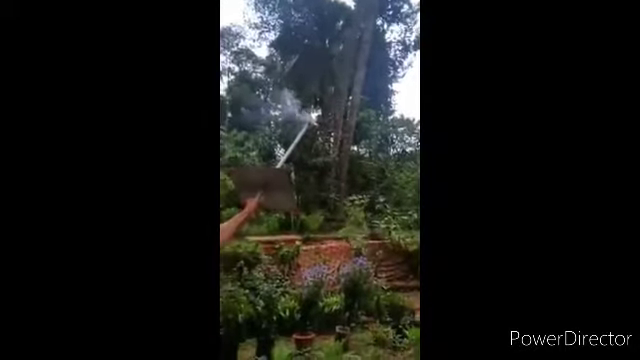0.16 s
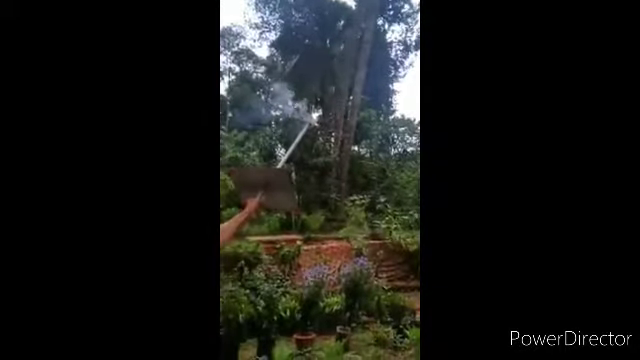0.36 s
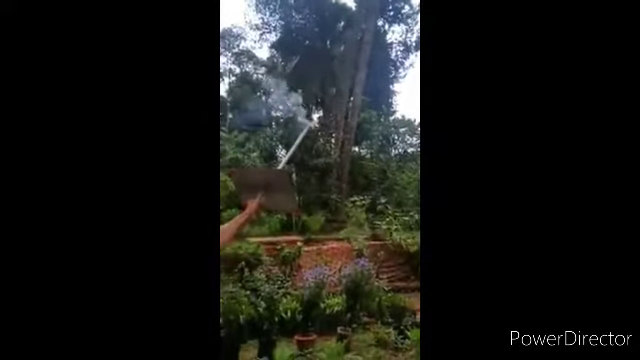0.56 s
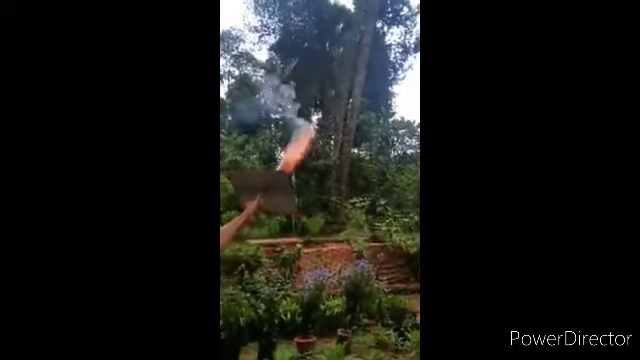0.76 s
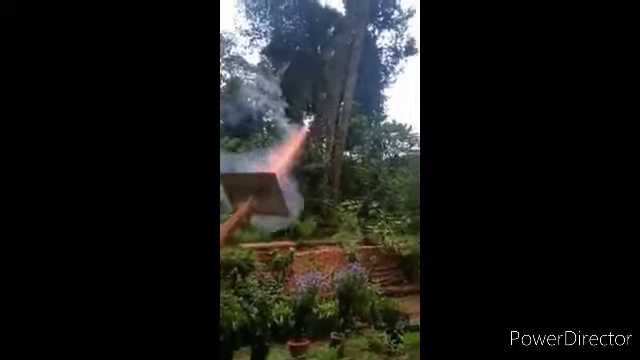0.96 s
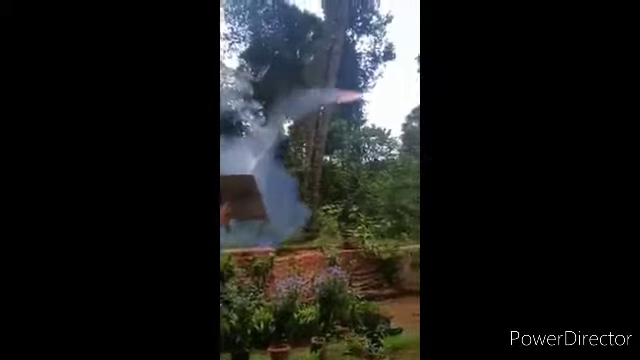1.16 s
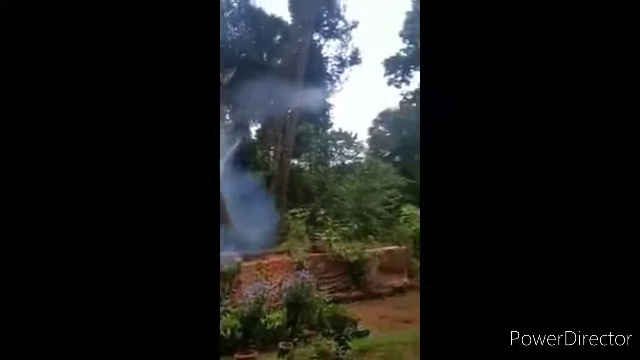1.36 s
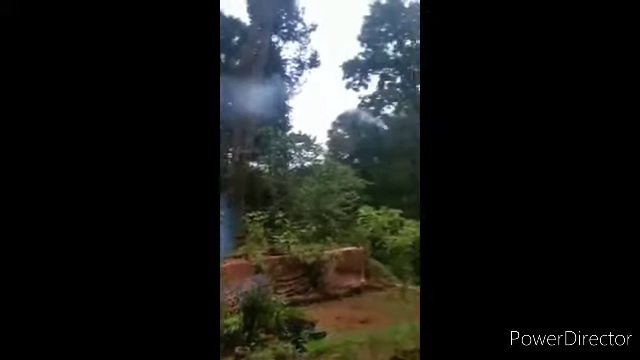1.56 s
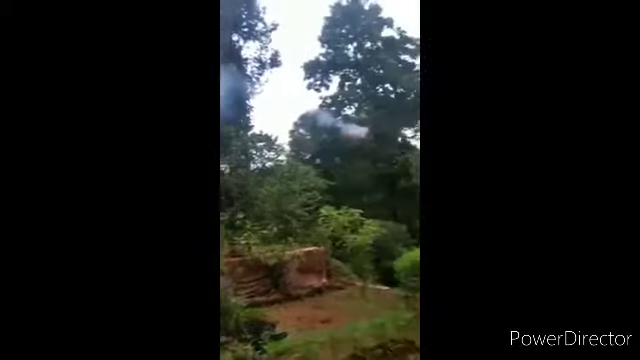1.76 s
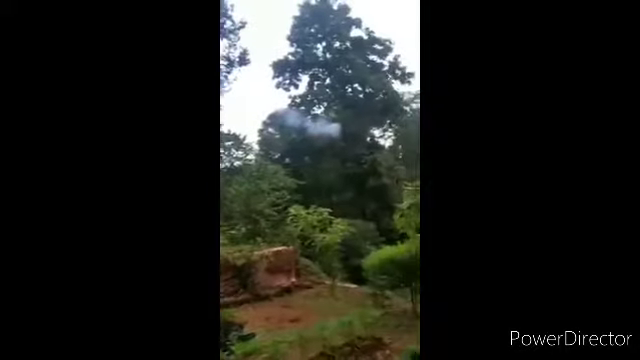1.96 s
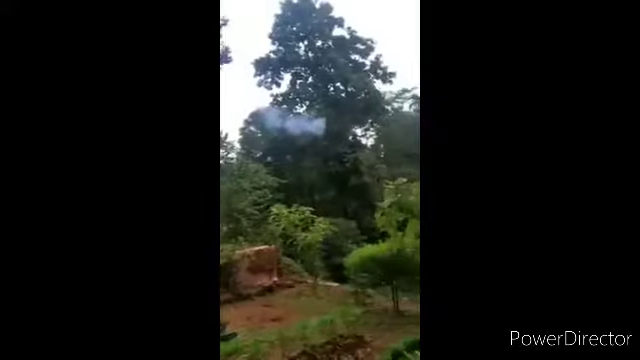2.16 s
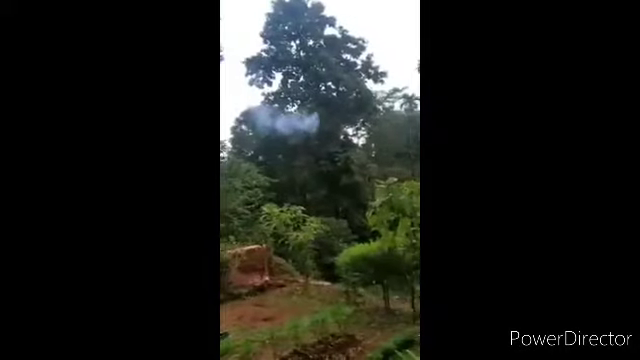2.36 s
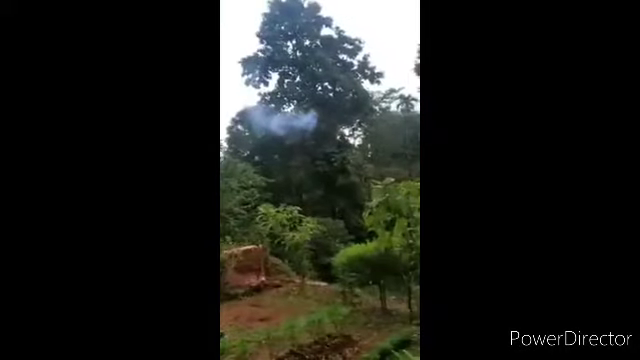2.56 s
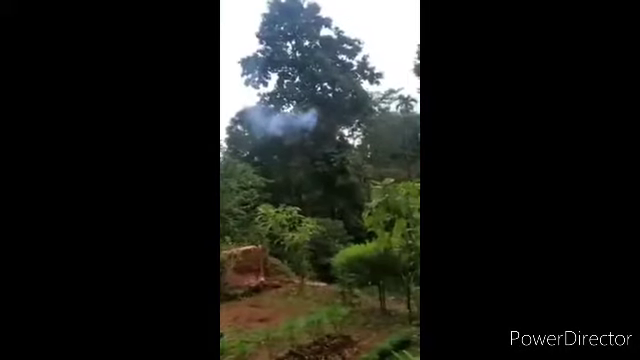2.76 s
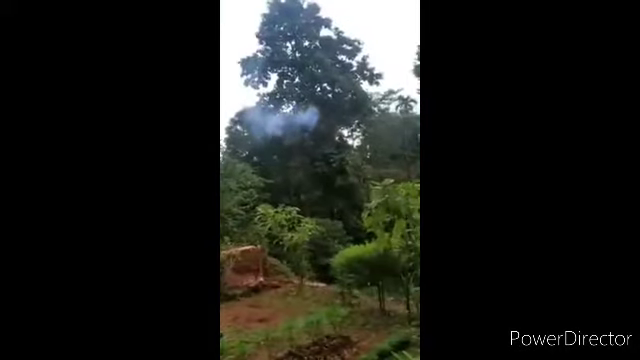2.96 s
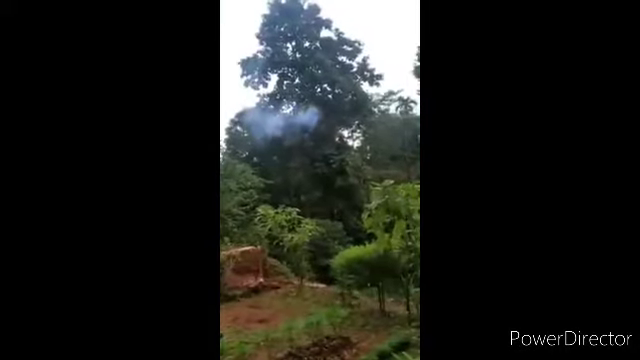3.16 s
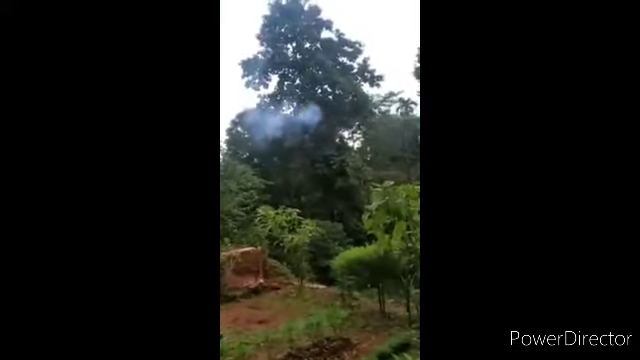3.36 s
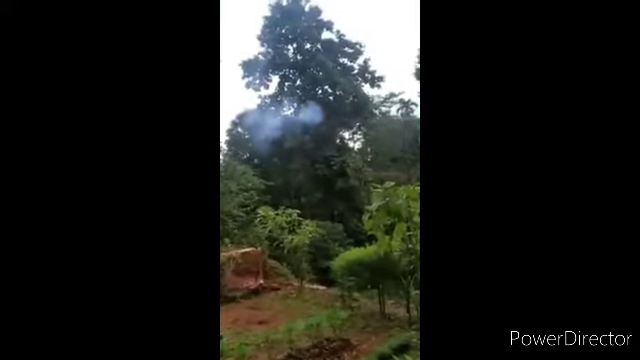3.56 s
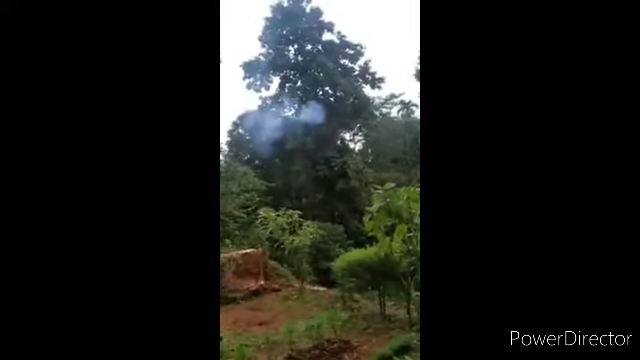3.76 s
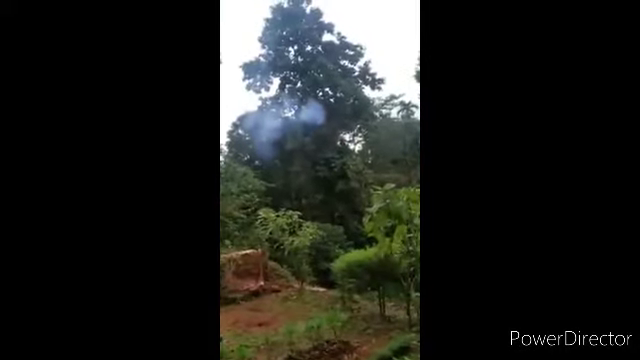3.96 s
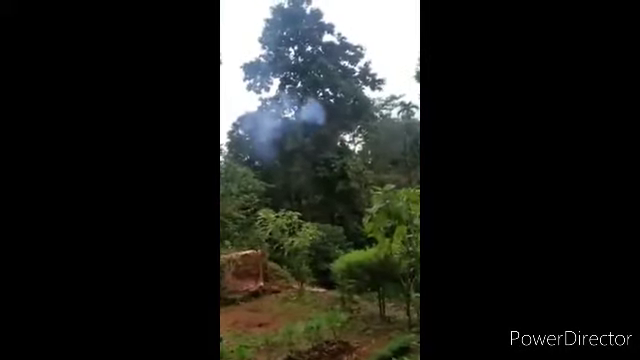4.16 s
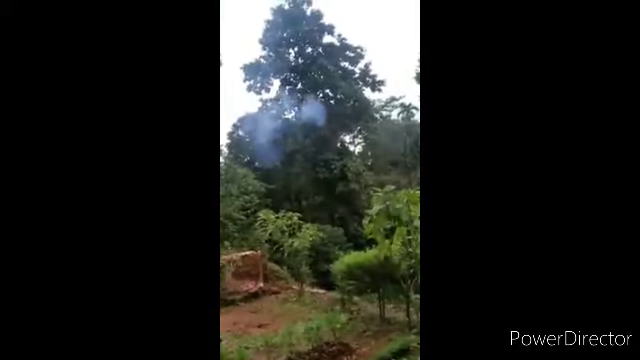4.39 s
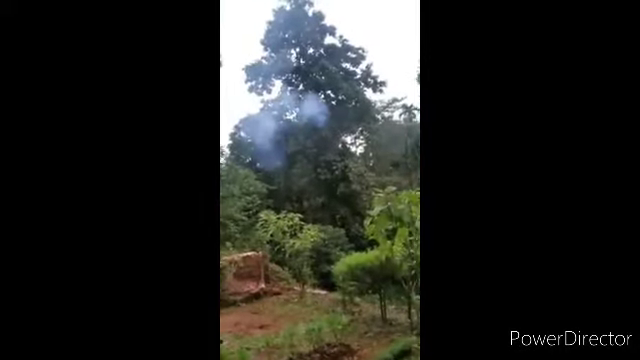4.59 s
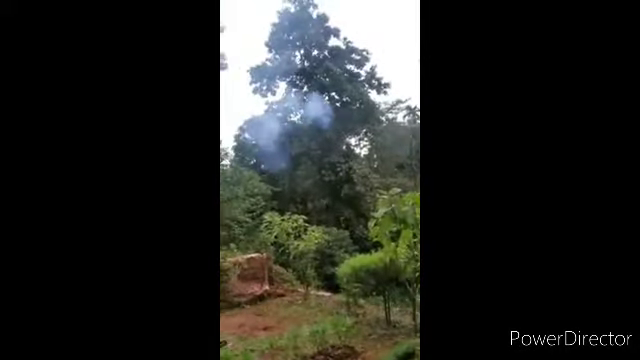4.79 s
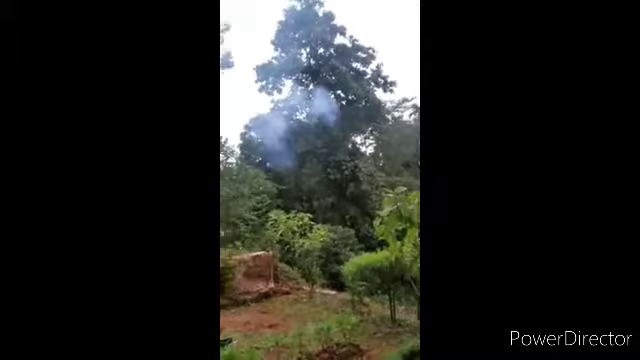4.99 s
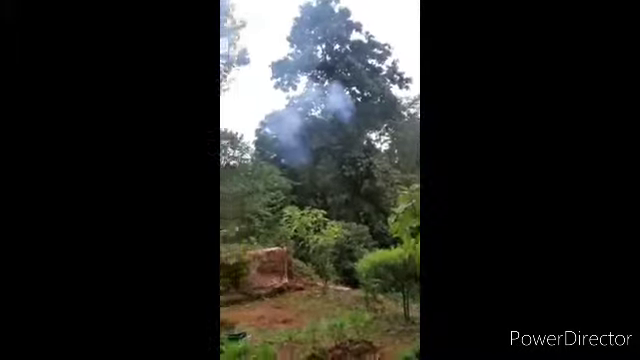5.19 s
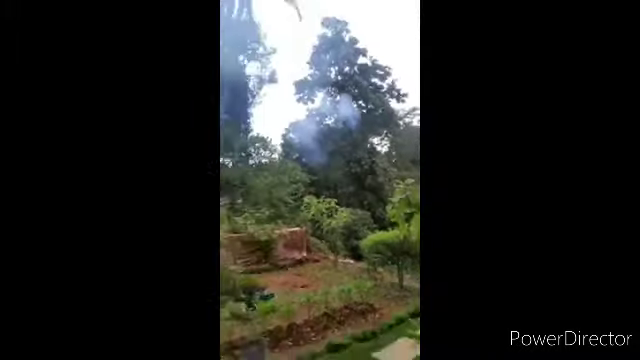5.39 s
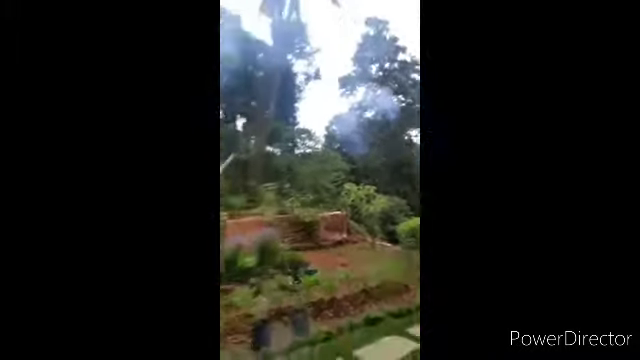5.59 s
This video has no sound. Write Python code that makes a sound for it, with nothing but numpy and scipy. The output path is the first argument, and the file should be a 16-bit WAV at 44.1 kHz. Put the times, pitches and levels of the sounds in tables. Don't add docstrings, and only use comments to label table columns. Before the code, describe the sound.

A firework rocket's fuse spits, its jet roars away with a bright hiss, then a sharp overloaded bang echoes through a garden of buzzing cicadas.

```python
import sys
import numpy as np
from scipy import signal
from scipy.fft import rfft, irfft, next_fast_len
from scipy.io import wavfile
from scipy.ndimage import uniform_filter1d, minimum_filter1d, map_coordinates

SR = 44100
rng = np.random.default_rng(int(sys.argv[2]) if len(sys.argv) > 2 else 0)


def gain_from_db(level_db):
    decades = np.asarray(level_db, float) / 20
    return 10 ** decades


def transcribe(u):
    v = np.clip(np.atleast_2d(u).T, -1, 1)
    q = np.round(v * 32767).astype(np.int16)
    wavfile.write(sys.argv[1], SR, q)


N = 248569

# f/Hz, level/dB per Hz
CHORUS_COLOUR = [(530, -50), (900, -32), (1200, -30.5), (1730, -15), (2400, -5), (3100, -5), (4400, -6),
                 (5900, -10.5), (6900, -20.5), (7900, -24), (8300, -61), (10900, -100)]
# t/s, half length/s, level/dB
CHORUS_SURGES = [(.1, 0.047, -39), (2.62, 0.37, -44.5), (3.55, 0.071, -48), (3.95, 0.034, -42.5),
                 (4.78, 0.11, -43.5), (5.25, 0.038, -37.5)]
# f/Hz, width/Hz, level/dB
TYMBALS = [(2765, 95, 0), (3045, 60, -6), (2600, 60, -9)]
# t/s, half length/s, level/dB
SINGER_PHRASES = [(.05, 0.035, -37.5), (.49, 0.11, -43.5), (.8, 0.055, -42.5), (2.66, 0.026, -46),
                  (2.81, 0.019, -41), (3.3, 0.043, -43), (3.48, 0.024, -51), (3.82, 0.1, -40.5),
                  (4.03, 0.036, -44), (4.46, 0.014, -40.5), (4.59, .035, -41), (5.02, 0.026, -45),
                  (5.165, 0.036, -36.5), (5.29, 0.042, -41), (5.4, 0.028, -45)]
# f/Hz, level/dB per Hz
RUSTLE_COLOUR = [(4710, -8.5), (8000, 1.5), (8610, -18.5), (9100, -6.5), (10100, 2.5), (13400, -10.5),
                 (15000, -8.5)]
# t/s, half length/s, level/dB
LEAF_GUSTS = [(.12, .12, -56), (2.65, 0.049, -59.5), (3.35, 0.096, -54.5), (3.95, 0.15, -58.5),
              (4.8, 0.15, -62.5), (5.2, 0.12, -58.5)]
# f/Hz, level/dB per Hz
BREEZE_COLOUR = [(12, -33.5), (20, 9), (48, -5), (70, -1), (188, -10.5), (225, -10.5), (566, -15.5),
                 (1500, -15.5), (1950, -52), (3300, -120)]
# t/s, peak level/dB, left minus right/dB, push/s
FINGER_BUMPS = [(.078, -40.5, -23, 0.0062), (.156, -32.5, -24.5, 0.0025), (.166, -35, -14, 0.0083),
                (4.14, -39, -10, 0.0041), (4.43, -34, -12, 0.0073), (4.843, -36, -16, 0.0049),
                (4.9062, -33.5, 19, 0.002), (5.33, -40, -19.5, 0.011)]
# t/s, level/dB
CASE_TAPS = [
    (4.9044, -20),
    (4.9092, -43.5),
    (4.9123, -34),
]
# f/Hz, width/Hz, level/dB
CASE_MODES = [(590, 260, 4.5), (1350, 650, -8)]
# t/s, peak level/dB, rise/dB per s, fall/dB per s
SKIN_SCUFF = [(4.9, -46.5, 500, 1198)]
# t/s, length/s, from f/Hz, to f/Hz, level/dB
DOVE_COOS = [(.18, 0.027, 805, 920, -57), (5.03, 0.047, 770, 865, -60.5), (5.12, 0.033, 860, 875, -62)]
# multiple of the wingbeat, level/dB
WING_TONES = [(2, -68), (3, -68), (4, -71)]
# t/s, peak level/dB, rise/dB per s, fall/dB per s
FUSE_FLARES = [
    (.98, -41.5, 315, 67),
    (1.11, -54, 48.5, 600),
]
# f/Hz, level/dB per Hz
SPIT_COLOUR = [(3820, -21.5), (6500, -6.5), (8110, -13), (8570, -12.5), (10300, -0.5), (13500, -11),
               (15500, -9.5)]
# t/s, level/dB
JET_THRUST = [(1.04, -41), (1.085, -39.5), (1.118, -24), (1.19, -22.5), (1.24, -16.5), (1.37, -12.5),
              (1.55, -12.5), (1.7, -19), (1.998, -27)]
# f/Hz, level/dB per Hz
HISS_COLOUR = [(880, -25), (1500, -22), (2260, -5), (2800, 0), (4230, 1), (4610, 1.5), (5670, 4),
               (8540, 2.5), (13400, -1.5), (15500, -2)]
# f/Hz, level/dB per Hz
ROAR_COLOUR = [(35, -56), (60, -24.5), (307, -13.5), (377, -12), (1120, -5.5), (1470, -6), (2490, -3),
               (3500, -11), (4550, -56), (7700, -120)]
# t/s, peak level/dB, rise/dB per s, fall/dB per s
PIPE_PUFFS = [
    (1.06, -40.5, 345, 98),
    (1.118, -27, 500, 400),
]
# t/s, peak level/dB, push/s
PIPE_KICKS = [(1.095, -33, 0.0019), (1.114, -17.5, 0.0007), (1.123, -19.5, 0.00074)]
# t/s, direct share/0-1, left port late by/microseconds
JET_BEARING = [(.97, .3, 100), (1.2, .7, 100), (1.28, .85, 100), (1.4, .9, 135), (1.5, .7, 120),
               (1.6, .6, 125), (1.7, .3, 110), (1.99, .15, 100)]
# t/s, peak level/dB, left minus right/dB, push/s
BLAST_PUSHES = [(1.9993, 4, 0, .0007), (2.0004, -3, 2, .0003), (2.0014, -9, -6, .0003),
                (2.002, -1, 6, .0005), (2.0023, -1, -6, .0004), (2.0029, 3, 0, .0007),
                (2.0051, 0, 1, .0005), (2.0062, -7, 4, .0003), (2.0074, -7, 4, .0004),
                (2.0095, -5, -2, .0006)]
# t/s, level/dB, fall/dB per s
FOLIAGE_ECHOES = [
    (2.0, -24.5, 23.5),
    (2.7, -50.5, 28),
]
# t/s, peak level/dB, rise/dB per s, fall/dB per s
LEAF_SHIMMER = [(2.7, -59, 40, 9)]
# t/s, peak level/dB, rise/dB per s, fall/dB per s
SLOPE_ECHOES = [
    (2.003, -16, 2994.5, 145),
    (2.29, -16, 14.5, 53),
    (2.5, -28.5, 25, 23.5),
    (3.5, -55.5, 9, 8.5),
]
# t/s, peak level/dB, rise/dB per s, fall/dB per s
GROUND_THUD = [(2.008, -21, 2000, 120)]
# f/Hz, level/dB per Hz
THUD_COLOUR = [(35, -25), (70, 2), (150, -1), (280, -4), (500, -41)]
# f/Hz, level/dB per Hz
BRIGHT_COLOUR = [(590, -26.5), (1000, -2.5), (1500, -10.5), (2650, -2), (4400, -10), (6000, -8.5),
                 (8100, -10.5), (11500, -14), (14500, -19), (14900, -49)]
# f/Hz, level/dB per Hz
DULL_COLOUR = [(24, -48), (40, -18.5), (193, -8), (325, -4.5), (379, -3), (605, -0.5), (1100, -4.5),
               (1620, -11.5), (1800, -14), (2500, -16.5), (3250, -44), (5500, -120)]
# f/Hz, level/dB per s
AIR_LOSS = [(100, 10.5), (500, 0.5), (1200, -8), (2500, -5.5), (4000, -1), (8500, -16), (14000, -38)]
# f/Hz, likeness/-1 to 1
PORT_LIKENESS = [(60, 0.33), (180, 1), (550, 0.83), (1650, 0.045), (4970, 0.04), (15000, 0.09)]
# left, right,
# time to peak/s
SLOW_SWINGS = [(.09, .08, .005), (0, -.26, .016), (0, .1, .1)]
# f/Hz, level/dB
ROUNDING_STEP = [(100, -14), (1000, -4), (2000, 1), (3500, 3), (5500, 3), (7500, 2), (10000, 1), (15000, 2)]
# f/Hz, level/dB
TOO_QUIET = [(100, -100), (5000, -84), (6500, -74.5), (8500, -72.5), (10500, -84), (13400, -80),
             (13900, -61.5), (15400, -45)]
STARVED_RANGE = (3100, 5700)


def unit(x):
    return x / np.sqrt(np.mean(x ** 2) + 1e-20)


def along(points, hz):
    f, v = np.transpose(points)
    return np.interp(np.log(hz + 1), np.log(f + 1), v)


def curves(rows):
    s, *cols = np.transpose(rows)
    return [np.interp(np.arange(N) / SR, s, c, left=-150, right=-150) for c in cols]


def wobble(rate):
    knots = rng.standard_normal(int(N * rate / SR) + 4)
    return map_coordinates(knots, [np.arange(N) * rate / SR])


def filtered(x, response):
    m = next_fast_len(N + 8192)
    return irfft(rfft(x, m) * response(np.fft.rfftfreq(m, 1 / SR)), m)[..., :N]


def modes(rows):
    return lambda f: sum(gain_from_db(db) * 1j * f * w / (c * c - f * f + 1j * f * w) for c, w, db in rows)


def tents(rows):
    t = np.arange(N) / SR
    power = 0
    for s, db, rise, fall in rows:
        power = power + gain_from_db(db - np.where(t < s, rise * (s - t), fall * (t - s))) ** 2
    return np.sqrt(power)


def bells(rows):
    t = np.arange(N) / SR
    return np.sqrt(sum(gain_from_db(2 * db) * np.exp(-((t - s) / half) ** 2) for s, half, db in rows))


def rush(spectrum, patchy_db, since=None):
    hz, t, z = signal.stft(rng.standard_normal((2, N)), SR, nperseg=512)
    field = uniform_filter1d(rng.standard_normal(z.shape[1:]), size=6, axis=0)
    field = uniform_filter1d(field, size=10, axis=1)
    tilt = 0 if since is None else along(AIR_LOSS, hz)[:, None] * np.clip(t - since, 0, 1.6)
    pair = signal.istft(z * gain_from_db(patchy_db * unit(field) + tilt), nperseg=512)[1][:, :N]

    def gain(f):
        return gain_from_db(along(spectrum, f))

    def spread(f):
        turn = np.arccos(np.clip(along(PORT_LIKENESS, f), -1, 1)) / 2
        return gain(f) * np.array([np.cos(turn), np.sin(turn)])

    mid, side = filtered(pair, spread)
    return np.array([mid + side, mid - side]) / np.sqrt(np.mean(gain(np.arange(SR // 2)) ** 2))


def pushes(rows, rise):
    out = np.zeros((2, N + SR))
    t = np.arange(SR // 10) / SR
    for s, db, pan_db, push in rows:
        u = t / push
        shape = (1 - u) * np.exp(-u) * (1 - np.exp(-u / rise)) * 2
        start = round(s * SR)
        out[:, start:start + len(t)] += gain_from_db(db + np.array([[.5], [-.5]]) * pan_db) * shape
    return out[:, :N]


def cicadas():
    t = np.arange(N) / SR
    beat = np.cumsum(50 + 6 * wobble(9)) / SR
    clicks = rng.standard_normal((2, N)) * gain_from_db(3.9 * np.sin(2 * np.pi * beat))
    song = unit(filtered(clicks, lambda f: modes(TYMBALS)(f) ** 2))
    singer = np.hypot(bells(SINGER_PHRASES), gain_from_db(-45.5)) * gain_from_db(1.2 * wobble(14)) * song
    chorus_level = np.hypot(bells(CHORUS_SURGES), gain_from_db(-38.5 - .6 * t)) * gain_from_db(.6 * wobble(8))
    return singer + chorus_level * rush(CHORUS_COLOUR, patchy_db=1.0)


def rustle():
    t = np.arange(N) / SR
    level = np.hypot(bells(LEAF_GUSTS), gain_from_db(-58.5 - .6 * t)) * gain_from_db(0.99 * wobble(6))
    return level * rush(RUSTLE_COLOUR, patchy_db=1.6)


def breeze():
    return gain_from_db(-61.5 + 0.4 * wobble(4.6)) * rush(BREEZE_COLOUR, patchy_db=1.5)


def fingers():
    taps = np.zeros(N)
    for s, db in CASE_TAPS:
        taps[round(s * SR)] = gain_from_db(db + 25)
    ring = filtered(taps, lambda f: modes(CASE_MODES)(f) / (1 + 1j * f / 2500) ** 2)
    brush = tents(SKIN_SCUFF) * rush([(5000, -33), (8000, 0), (12000, -1), (15000, -6)], patchy_db=2.5)
    return pushes(FINGER_BUMPS, rise=0.76) + ring + brush


def dove():
    t = np.arange(N) / SR
    out = np.zeros(N)
    for s, length, from_hz, to_hz, db in DOVE_COOS:
        u = np.clip((t - s) / length, 0, 1)
        cycles = length * (from_hz * u + (to_hz - from_hz) * u * u / 2)
        out += gain_from_db(db) * np.sin(np.pi * u) * np.sin(2 * np.pi * cycles)
    return out


def engine():
    t = np.arange(N) / SR
    first_s, every_s, lead_s = .51, 1.265, .19
    turns = first_s + every_s * np.arange(5)
    throbs = bells([(s, .085, -49) for s in turns] + [(s - lead_s, .045, -52) for s in turns])
    return throbs * gain_from_db([[-3], [3]]) * np.sin(2 * np.pi * 43 * t + 0.15 * wobble(18))


def fly():
    wing = 2 * np.pi * np.cumsum(286 * (1 + .004 * wobble(3))) / SR
    return sum(bells([(.85, .11, db)]) * np.sin(k * wing) for k, db in WING_TONES)


def fuse():
    return tents(FUSE_FLARES) * rush(SPIT_COLOUR, patchy_db=4.0)


def jet_noise(hiss_db, roar):
    hiss = gain_from_db(hiss_db) * rush(HISS_COLOUR, patchy_db=.8, since=1.72)
    return hiss + roar * rush(ROAR_COLOUR, patchy_db=1.2)


def rocket():
    hiss_db, = curves(JET_THRUST)
    direct, lag = curves(JET_BEARING)
    direct = np.clip(direct, 0, 1)
    since_off = np.arange(N) / SR - JET_THRUST[5][0]
    roar = np.hypot(gain_from_db(hiss_db - 11.5 - 7 * since_off), tents(PIPE_PUFFS))
    straight = jet_noise(hiss_db, roar)
    late = map_coordinates(straight[0], [np.arange(N) - lag * SR / 1e6])
    lagged = np.array([late, straight[0]])
    straight = filtered(lagged - straight, lambda f: 1 / (1 + (f / 7500) ** 6)) + straight
    sputter = unit(gain_from_db(.5 * wobble(14) + .8 * wobble(400)))
    around = jet_noise(hiss_db, roar)
    kicks = pushes([(s, db, 0, push) for s, db, push in PIPE_KICKS], rise=0.14)
    return (np.sqrt(direct) * straight + np.sqrt(1 - direct) * around) * sputter + kicks


def burst():
    t = np.clip(np.arange(N) / SR - BLAST_PUSHES[0][0], 0, None)
    shock = filtered(pushes(BLAST_PUSHES, rise=0.21), lambda f: 1.1 / (1 + 1j * f / 5500) ** 2)
    leaves = tents([(s, db, 9, fall) for s, db, fall in FOLIAGE_ECHOES])
    grove = bells([(2.106, 0.2, -15.5)])
    filling = (1 - 0.4 * np.exp(-t / 0.081)) * (t > 0)
    trees = np.hypot(leaves, grove) * filling
    near = trees * gain_from_db(1.1 * wobble(30.24)) * rush(BRIGHT_COLOUR, patchy_db=2.0, since=1.994)
    shimmer_colour = [(7000, -40), (8200, 0), (9300, 0), (10000, -40)]
    near += tents(LEAF_SHIMMER) * (t < 1.55) * rush(shimmer_colour, patchy_db=1.5)
    far = tents(SLOPE_ECHOES) * gain_from_db(0.59 * wobble(25.2)) * rush(DULL_COLOUR, patchy_db=-0.5, since=2.27)
    far += tents(GROUND_THUD) * rush(THUD_COLOUR, patchy_db=2.4)
    return shock + near + far * (1 - np.exp(-(t / .007) ** 2))


def sag():
    t = np.clip(np.arange(N) / SR - BLAST_PUSHES[0][0], 0, None)
    return sum(np.outer([left, right], np.e * t / s * np.exp(-t / s)) for left, right, s in SLOW_SWINGS)


def phone_rounding(x):
    size = 1024
    n, k = np.arange(2 * size), np.arange(size)
    window = np.sin(np.pi * (n + .5) / (2 * size))
    basis = window[:, None] * np.cos(np.pi / size * np.outer(n + .5 + size / 2, k + .5))
    pair = np.pad([x[0] + x[1], x[0] - x[1]], ((0, 0), (size, 2 * size - N % size)))
    pair = pair.reshape(2, -1, size) / 2
    lines = np.concatenate([pair[:, :-1], pair[:, 1:]], axis=2) @ basis * np.sqrt(2 / size)
    power = np.mean(lines ** 2, axis=0)
    hz = (k + .5) * SR / (2 * size)
    mask = power + .65 * np.abs(uniform_filter1d(power, size=260, axis=1)) * (hz > 2200)
    treble = power[:, (hz > 7000) & (hz < 15000)].mean(axis=1, keepdims=True)
    whim = np.repeat(gain_from_db(5 * rng.standard_normal((len(power), size // 16))), 16, axis=1)
    starved = (hz > STARVED_RANGE[0]) & (hz < STARVED_RANGE[1])
    mask = mask + 1.1 * treble * whim * starved
    mask = (mask + gain_from_db(2 * along(TOO_QUIET, hz))) * gain_from_db(2 * along(ROUNDING_STEP, hz))
    band = np.sqrt(mask.reshape(len(mask), -1, 16).mean(axis=2))
    step = np.repeat(band * gain_from_db(2.4 * rng.standard_normal(band.shape)), 16, axis=1)
    loud_db = 10 * np.log10(power[:, :size // 8].sum(axis=1) + 1e-12)
    before = minimum_filter1d(loud_db, size=3, origin=1)
    sudden = (loud_db - before > 9) & (loud_db > 0)
    step = step * gain_from_db(-16 * sudden)[:, None]
    kept = np.sign(lines) * np.floor(np.abs(lines) / step + .4) * step * (hz < 15500)
    frames = kept @ basis.T * np.sqrt(2 / size)
    mid, side = (frames[:, :-1, size:] + frames[:, 1:, :size]).reshape(2, -1)[:, :N]
    return np.array([mid + side, mid - side])


def scene():
    ambience = cicadas() + rustle() + breeze() + fingers() + dove() + engine() + fly()
    return ambience + fuse() + rocket() + burst()


def roll_off(x):
    return signal.sosfilt(signal.butter(12, 16630, fs=SR, output="sos"), x)


def record(dry):
    ports = filtered(dry, lambda hz: 1j * hz / (18 + 1j * hz)) + sag()
    clipped = ports / (1 + np.abs(ports / .86) ** 6) ** (1 / 6)
    mix = phone_rounding(clipped)
    return roll_off(mix)


dry = scene()
out = record(dry)
transcribe(out)
```